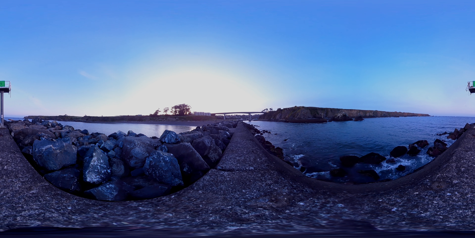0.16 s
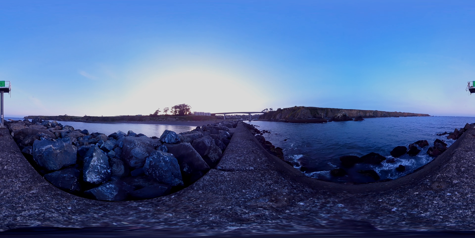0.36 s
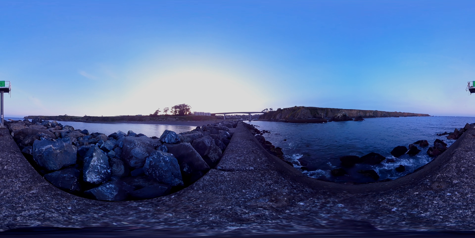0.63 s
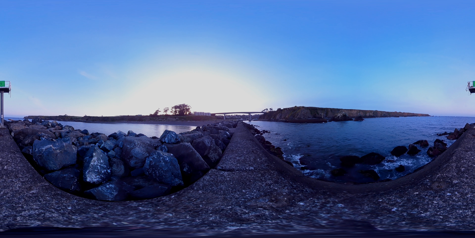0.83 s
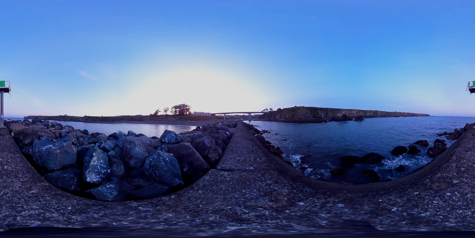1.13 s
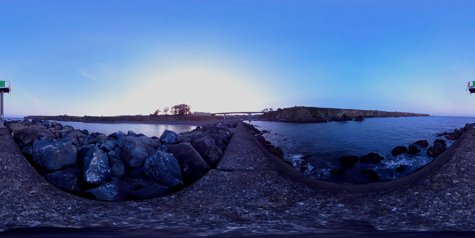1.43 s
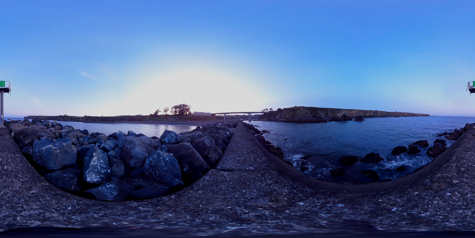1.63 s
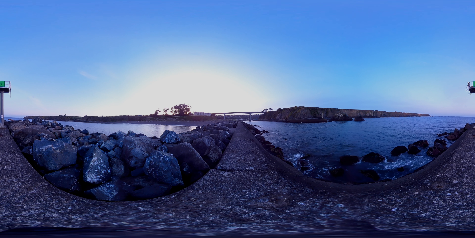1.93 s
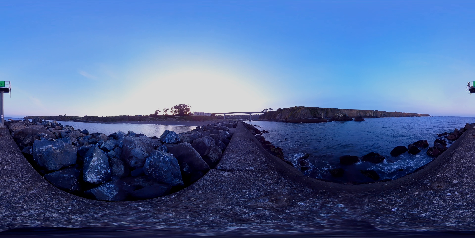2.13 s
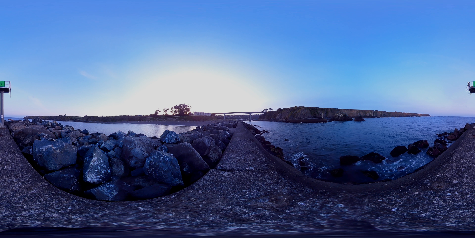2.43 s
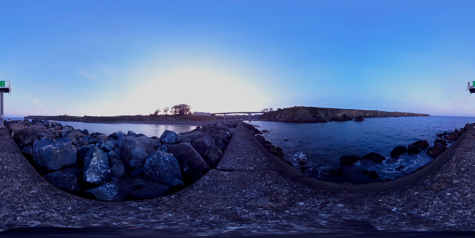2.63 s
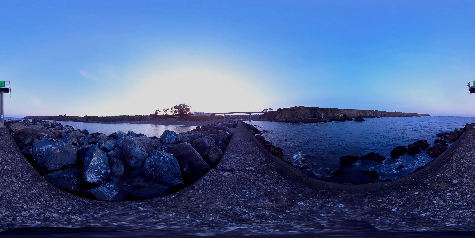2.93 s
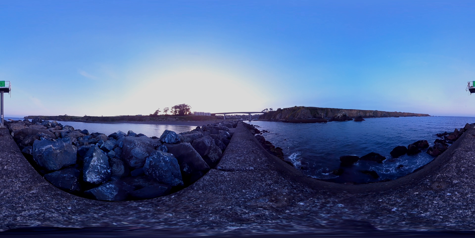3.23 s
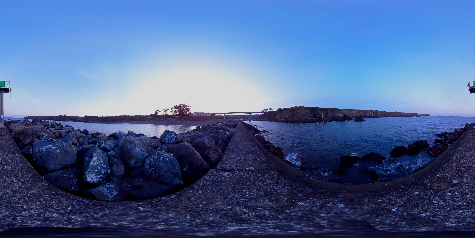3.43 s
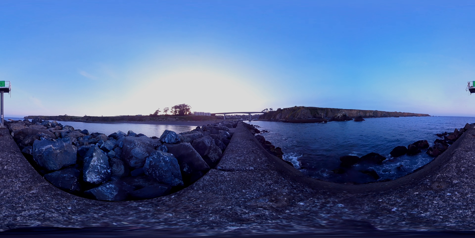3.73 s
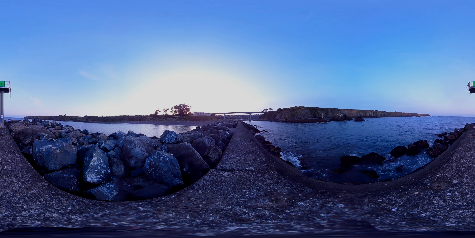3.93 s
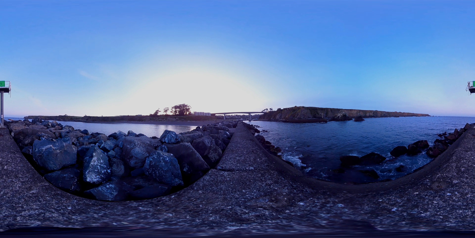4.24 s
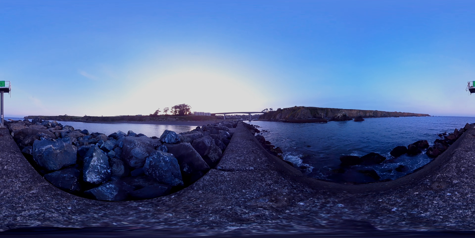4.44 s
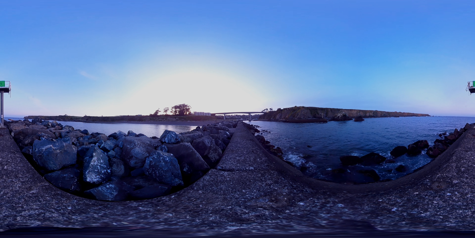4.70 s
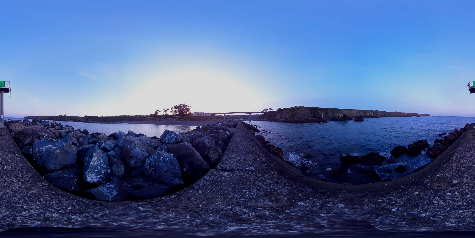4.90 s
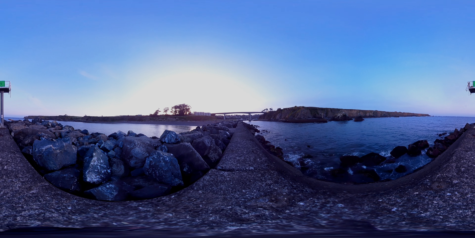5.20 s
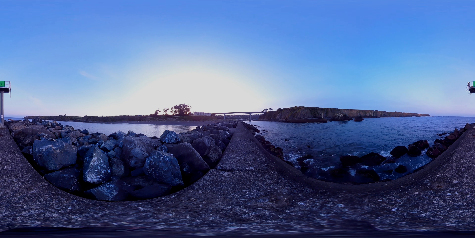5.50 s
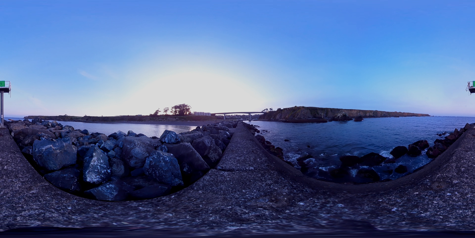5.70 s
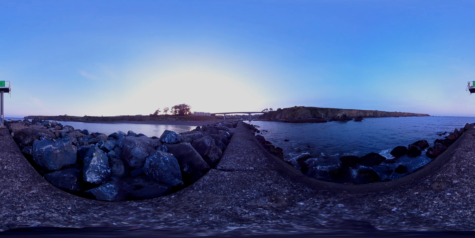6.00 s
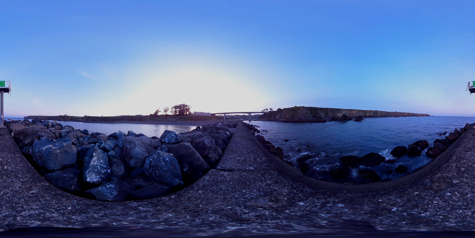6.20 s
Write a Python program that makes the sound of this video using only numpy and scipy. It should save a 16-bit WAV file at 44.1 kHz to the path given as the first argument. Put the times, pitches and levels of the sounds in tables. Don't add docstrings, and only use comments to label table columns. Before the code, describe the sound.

Small waves wash and slap over jetty rocks with foam and spray, a faint distant horn hums briefly, and wind buffets the microphone increasingly.

```python
import sys
import numpy as np
from scipy import signal
from scipy.fft import rfft, irfft, dct, next_fast_len
from scipy.io import wavfile
from scipy.ndimage import uniform_filter1d

SR = 44100
rng = np.random.default_rng(int(sys.argv[2]) if len(sys.argv) > 2 else 0)


def put_to_file(sound):
    columns = np.atleast_2d(sound).T
    safe = np.clip(columns, -1, 1)
    whole_steps = np.round(safe * 32767)
    wavfile.write(sys.argv[1], SR, whole_steps.astype(np.int16))


def gain_from_db(level_db):
    decades = np.asarray(level_db, float) / 20
    return 10 ** decades


N = 280337

# pitch_hz [Hz], level_db [dB per Hz]
SEA_COLOUR = [(250, 0.0), (600, -4.8), (1100, -7.6), (2000, -13.0), (3200, -19.7), (3900, -25.1),
              (4500, -30.4), (5100, -19.2), (5600, -13.3), (6400, -18.1), (7500, -21.2), (9600, -21.8),
              (10800, -30.4), (11600, -42.0)]
# time_s [s], level_db [dB]
ALL_AROUND = [(0, 1), (.6, 0), (1.3, 0), (1.7, -3.5), (2.2, -1.5), (2.7, -3.5), (3.0, 1), (3.5, 1),
              (4.1, 1), (4.6, 0.5), (4.9, -2), (5.5, -4), (5.9, 0), (6.36, 1.5)]


def rms_one(x):
    return x / np.sqrt(np.mean(x ** 2) + 1e-20)


def in_time(rows):
    time_s, *columns = np.transpose(rows)
    return [np.interp(np.arange(N) / SR, time_s, column) for column in columns]


def at_hz(points, hz, axis=1):
    table = np.array(points)
    return np.interp(np.log(np.maximum(hz, 1)), np.log(table[:, 0]), table[:, axis])


def drift(rate):
    r = np.exp(-80 * np.pi * rate / SR)
    coarse = rng.standard_normal(N // 40 + 2002)
    slow = signal.lfilter([1], [1, -2 * r, r * r], coarse)[2000:]
    return np.interp(np.arange(N) / 40, np.arange(len(slow)), rms_one(slow))


def shaped(x, gain):
    size = next_fast_len(N)
    hz = np.arange(size // 2 + 1) * SR / size
    return irfft(rfft(x, size) * gain(hz), size)[..., :N]


def ring(clicks, hz, t60):
    r, w = gain_from_db(-60 / (t60 * SR)), 2 * np.pi * hz / SR
    return signal.lfilter([0, np.sin(w)], [1, -2 * r * np.cos(w), r * r], clicks + 1e-18)


def add(track, s, sound):
    i = int(s * SR)
    track[..., i:i + sound.shape[-1]] += sound[..., :N - i]


def pulse(hz, cycles, rise):
    u = np.arange(int(4 * cycles / hz * SR)) * hz / SR / cycles
    swell = u * np.exp(1 - u * 2) * 2
    return swell * np.sin(2 * np.pi * cycles * u * (1 + rise * u))


def horn():
    # time_s [s], pitch_hz [Hz], level_db [dB]
    horn_course = [
        (1.0, 159.7, -66),
        (1.08, 153, -51),
        (1.3, 159.9, -56),
        (1.6, 157.8, -49),
        (1.9, 159, -45.5),
        (2.07, 156.5, -50.5),
        (2.15, 163, -82.5),
    ]
    hz, level_db = in_time(horn_course)
    phase = 2 * np.pi * np.cumsum(hz + 1.5 * drift(8)) / SR
    return np.sqrt(2) * gain_from_db(level_db + 2.0 * drift(2.7)) * np.sin(phase)


def gusts():
    # middle_s [s], length_s [s], left_db [dB], right_db [dB]
    gust_list = [(0.076, .1, -40.5, -38.5), (0.223, .12, -44.5, -41.5), (0.666, 0.13, -49, -48),
                 (0.882, 0.15, -35.5, -36), (1.273, 0.25, -43.5, -36.5), (1.505, .1, -44, -41.5),
                 (1.685, .12, -47.5, -42), (1.958, .25, -47.5, -46.5), (2.157, 0.1, -49.5, -41),
                 (2.515, 0.14, -39, -37.5), (2.755, .25, -38, -40.5), (3.018, 0.24, -36.5, -36),
                 (3.374, .15, -38, -31.5), (3.53, 0.19, -33.5, -33), (3.78, 0.069, -36, -33),
                 (3.94, 0.11, -44.5, -36.5), (4.097, 0.085, -38, -37), (4.258, 0.18, -38, -33),
                 (4.442, 0.13, -32, -38), (4.602, 0.16, -39.5, -32.5), (4.96, 0.23, -37.5, -37.5),
                 (5.164, 0.17, -36.5, -36.5), (5.252, 0.045, -43, -31.5), (5.493, .2, -34, -26.5),
                 (5.752, 0.3, -28.5, -33), (5.919, 0.11, -28, -32), (6.044, .14, -36, -27),
                 (6.185, 0.16, -27, -29), (6.286, 0.11, -36, -28.5), (6.36, .1, -23, -33)]
    edge_db, calm_db = 5.5, -55.5
    middle_s, length_s, *port_db = np.transpose(gust_list)
    t = np.arange(0, N + 100, 100) / SR
    from_middle = 2 * (t - middle_s[:, None]) / length_s[:, None]
    arch = gain_from_db(-2 * edge_db * from_middle ** 2)
    power = gain_from_db(2 * np.array(port_db)) @ arch + gain_from_db(2 * calm_db)
    return np.array([np.interp(np.arange(N) / SR, t, 10 * np.log10(p)) for p in power])


def wind():
    # pitch_hz [Hz], level_db [dB per Hz]
    wind_colour = [(15, 3.5), (30, 1), (60, 6.5), (110, 2.5), (170, -4), (260, -28), (500, -34.5),
                   (2000, -77)]
    # start_s [s], peak_db [dB], pitch_hz [Hz], left_minus_right_db [dB]
    thumps = [(0.448, -24.5, 149, 1), (0.864, -33.5, 135, -28), (0.885, -28, 93, -19),
              (3.428, -29, 41.7, 0), (3.537, -35.5, 42.6, 2), (4.271, -24.5, 135, -3),
              (4.929, -28, 107.4, 1.5), (5.409, -29, 77, 2), (5.468, -22, 55, -11), (5.52, -33, 137, -23),
              (5.587, -28.5, 80.8, -14), (5.869, -26, 115.7, 16), (6.21, -27, 135, 16.5)]
    noise = rng.standard_normal((2, N))
    rumble = shaped(noise, lambda f: gain_from_db(at_hz(wind_colour, f)) * f / (f + 8))
    gust_db = gusts()
    flutter = shaped(rumble, lambda f: np.clip(np.log2(f / 90 + 1e-9), 0, 1))
    rumble = rumble + flutter * (gain_from_db(0.43 * (gust_db + 41)) - 1)
    lumps = np.array([drift(25), drift(25)])
    evened = rumble / np.sqrt(uniform_filter1d(rumble ** 2, size=4000, axis=1))
    out = rms_one(evened * gain_from_db(0.37 * lumps)) * gain_from_db(gust_db - 2.53)
    for s, peak_db, hz, pan_db in thumps:
        port_db = peak_db - 5 + np.array([[.5], [-.5]]) * pan_db
        add(out, s, gain_from_db(port_db) * pulse(hz, 0.95, 0.0092))
    return out


def bursts():
    # start_s [s], length_s [s], level_db [dB], centre_hz [Hz]
    mist_bursts = [(0.009, 0.074, -58.5, 9950), (0.149, 0.1, -53.5, 10140), (0.351, 0.055, -57, 9910),
                   (0.446, 0.11, -58.5, 10050), (0.634, 0.051, -58, 9950), (0.724, 0.22, -61, 10110),
                   (0.998, 0.059, -64.5, 10600), (1.149, 0.17, -62.5, 10060), (1.417, 0.12, -62.5, 9980),
                   (1.591, 0.045, -67, 9130), (1.802, 0.13, -67.5, 9150), (1.935, 0.12, -65.5, 9550),
                   (2.063, 0.088, -65, 9160), (2.24, 0.044, -72, 9330), (2.818, 0.048, -57, 10100),
                   (2.952, 0.38, -57.5, 10150), (3.374, 0.08, -55.5, 9960), (3.627, 0.26, -56.5, 10090),
                   (3.999, 0.38, -58, 10180), (4.397, 0.34, -55.5, 9760), (5.047, 0.052, -65.5, 9800),
                   (5.33, 0.072, -61, 9220), (5.409, 0.077, -58.5, 9180), (5.534, 0.044, -67.5, 10440),
                   (5.768, 0.11, -64.5, 9900), (5.906, 0.077, -65, 9470), (6.006, 0.04, -62.5, 9600),
                   (6.163, 0.066, -66, 9140)]
    late_s, shorter_s = 0.005, .026
    fade_db_per_s = 2498.5
    s, length_s, level_db, hz = np.transpose(mist_bursts)
    t = np.arange(0, N + 100, 100) / SR
    start = s + late_s
    stop = start + np.maximum(length_s - shorter_s, 0)
    outside_s = np.maximum(np.maximum(start[:, None] - t, t - stop[:, None]), 0)
    each_db = level_db[:, None] - fade_db_per_s * outside_s
    return in_time(np.transpose([t, each_db.max(axis=0), hz[each_db.argmax(axis=0)]]))


def mist(level_db, hz, width_hz, faint_width_hz):
    white = rng.standard_normal((2, N))
    strong = np.clip((level_db + 70.5) / 8, 0, 1)
    wide = rms_one(shaped(white, lambda f: np.exp(-(f / width_hz) ** 4)))
    thin = rms_one(shaped(white, lambda f: np.exp(-(f / faint_width_hz) ** 4)))
    slow = strong * wide * gain_from_db(4.6 * drift(25)) + (1 - strong) * thin * gain_from_db(3.0)
    phase = 2 * np.pi * np.cumsum(hz + 60 * drift(14)) / SR
    return (slow[0] * np.cos(phase) + slow[1] * np.sin(phase)) * gain_from_db(level_db)


def bubbles(surge_db, per_s, cycles):
    sizes = gain_from_db(8.1 * np.minimum(rng.exponential(1, N), 5)) * rng.choice([-1, 1], N)
    rate = per_s * gain_from_db(surge_db - surge_db.mean() + 3 * drift(5))
    born = rng.random(N) < rate / SR
    pitches, dealt = np.geomspace(200, 1600, 16), rng.integers(0, 16, N)
    rings = sum(ring(sizes * born * (dealt == k), hz, cycles / hz) for k, hz in enumerate(pitches))
    return gain_from_db(surge_db) * rms_one(rings)


def slaps():
    # start_s [s], peak_db [dB], pitch_hz [Hz]
    hollow_slaps = [(2.013, -27.5, 396), (2.188, -27, 218), (2.239, -28, 347.3), (2.667, -25, 256),
                    (3.258, -25.5, 201.3), (3.377, -19, 362), (3.419, -20.5, 754), (3.51, -23.5, 323),
                    (3.59, -32.5, 346), (4.272, -36.5, 249), (4.463, -29, 274), (4.773, -36, 228),
                    (4.845, -29.5, 213), (5.089, -24.5, 372), (5.375, -25, 367), (5.866, -31.5, 374)]
    # start_s [s], peak_db [dB]
    splashes = [(0.0244, -46), (3.246, -32), (3.7661, -27), (3.896, -36), (4.7347, -41), (4.874, -40),
                (4.946, -26.5), (4.97, -28.5), (5.036, -36), (5.102, -28.5), (5.1993, -34), (5.3227, -48),
                (5.5012, -34.5), (5.9404, -32), (6.2094, -26)]
    out, spray = np.zeros(N), np.zeros(N)
    for s, peak_db, hz in hollow_slaps:
        add(out, s, gain_from_db(peak_db - 5) * pulse(hz, 1.2, .1))
    t = np.arange(2000) / SR
    patter = np.minimum(t / 0.0017, 1) * np.exp(-t / 0.015)
    for s, peak_db in splashes:
        add(spray, s, gain_from_db(peak_db - 6.5) * patter)
    noise = rng.standard_normal(N)
    drops = shaped(noise, lambda f: gain_from_db(at_hz(SEA_COLOUR, f)) * f / np.hypot(f, 2500) / np.hypot(f, 4000))
    return out + spray * rms_one(drops)


def wash(surge_db, foam_db, spray_db, aside, patchy_db, grain_db, low_cut_hz):
    sizes = gain_from_db(grain_db * np.minimum(rng.exponential(1, (3, N)), 5))
    grains = rng.standard_normal((3, N)) * sizes
    foam = shaped(grains, lambda f: gain_from_db(at_hz(SEA_COLOUR, f)) / np.hypot(1, (low_cut_hz / (f + 1)) ** 2))
    size = next_fast_len(N)
    spectrum = rfft(rms_one(foam), size)
    pitch = np.log2(np.arange(size // 2 + 1) * SR / size + 1)
    out, together = 0, drift(8.3)
    for octave in np.arange(6.5, 13.4, .75):
        weight = np.clip(1 - abs(np.minimum(pitch, 13.25) - octave) / .75, 0, 1)
        band = irfft(spectrum * weight, size)[:, :N]
        foamy = np.interp(octave, [10.4, 11.2, 12, 12.4], [0, 1, 1, 0])
        sprayed = np.interp(octave, [12, 12.4], [0, 1])
        flicker = patchy_db * (0.3 * together + 1.0 * drift(11) + 1.0 * drift(18))
        out = out + band * gain_from_db(surge_db + foamy * foam_db + sprayed * spray_db + flicker)
    finest = shaped(out, lambda f: np.clip((f - 9700) / 600, 0, 1))
    return out - (1 - aside) * finest


def ports(direct, scattered):
    # pitch_hz [Hz], left_lag [radians], likeness [0-1]
    port_pair = [(250, .03, .9), (500, .1, .955), (860, .37, .88), (1200, .57, .79), (1600, .77, .69),
                 (2600, 1.3, .67), (3300, 1.7, .55), (3900, 2.3, .6), (4400, 3.1, .88), (5400, 2.5, .7),
                 (6500, 3.1, .9), (8000, 3.1, .92), (11000, 3.14, .94)]

    def alike(f):
        return np.clip(at_hz(port_pair, f, axis=2), 0, 1)

    def lag(f):
        return np.exp(np.outer([-.5j, .5j], at_hz(port_pair, f)))

    lagged = shaped(direct, lambda f: np.sqrt(alike(f)) * lag(f))
    apart = shaped(scattered, lambda f: np.sqrt(1 - alike(f)))
    bright = shaped(apart, lambda f: np.clip((f - 2500) / 1200, 0, 1))
    return lagged + apart + bright * (gain_from_db(in_time(ALL_AROUND)[0]) - 1)


def scene():
    # time_s [s], surge_db [dB], froth_db [dB above usual]
    wash_course = [(0.0, -38, -.5), (0.3, -39, 0), (0.55, -41.5, 0.4), (1.3, -42.5, -1), (1.6, -42, -2),
                   (2.05, -42, 0.5), (2.32, -40.5, -3), (2.55, -41.5, -1), (3.0, -43, 0.5), (3.18, -42, 3),
                   (3.4, -38, -1.5), (3.7, -41, 1.5), (4.1, -40.5, -1), (4.85, -41, 2.5), (5.18, -40, 1.5),
                   (5.5, -40, 2.5), (6.0, -41.5, 1.5), (6.36, -41, -2)]
    surge_db, foam_db = in_time(wash_course)
    spray_db = 1.1 + 0.74 * foam_db + 0.23 * in_time(ALL_AROUND)[0]
    mist_db, mist_hz = bursts()
    aside = np.interp(mist_db, [-70, -58], [1, .35])
    sea = wash(surge_db + 2.5, foam_db, spray_db, aside, patchy_db=0.93, grain_db=0.5, low_cut_hz=167)
    air = gain_from_db(-13.0) * bubbles(surge_db, per_s=150, cycles=4)
    direct = sea[0] + air + slaps() + horn()
    hiss = mist(mist_db - 2.5, mist_hz, width_hz=680, faint_width_hz=320)
    return ports(direct, sea[1:]) + hiss + wind()


def leave_out_masked(x):
    # pitch_hz [Hz], under_both_db [dB under both channels], always_db [dB per Hz]
    masking = [(100, -30, -120), (400, -21.5, -112), (1500, -15, -108), (2700, -10.5, -106),
               (3700, -6.6, -102), (4400, -4.5, -100), (5000, -9, -102), (5600, -12, -103),
               (6100, -7, -102), (6800, -5, -103), (8200, -5, -103), (9000, -7, -103), (10200, -6, -101),
               (11500, -5, -107)]
    hop, lead, turn = 1024, 724, np.array([[1, 1], [1, -1]])
    padded = np.pad(turn @ x / 2, ((0, 0), (hop + lead, 3 * hop)))
    frames = np.lib.stride_tricks.sliding_window_view(padded, 2 * hop, axis=1)[:, ::hop]
    window = np.sin(np.pi * (np.arange(2 * hop) + .5) / (2 * hop))
    a, b, c, d = np.split(frames * window, 4, axis=2)
    folded = np.concatenate([-c[..., ::-1] - d, a - b[..., ::-1]], axis=2)
    lines = dct(folded, type=4, norm="ortho")
    near = uniform_filter1d(lines ** 2, size=6, axis=2)
    around = uniform_filter1d((lines ** 2).sum(axis=0), size=33, axis=1)
    hz = (np.arange(hop) + .5) * SR / 2 / hop
    hidden = around * gain_from_db(2 * at_hz(masking, hz))
    too_faint = gain_from_db(2 * at_hz(masking, hz, axis=2)) * SR / 2
    limit = np.maximum(hidden, too_faint)
    count = len(around)
    budget_db = np.repeat(rng.normal(0, 1.7, (2, count, 64)), 16, axis=2)
    thrift_db = .6 + 1.0 * drift(5)[np.minimum(np.arange(count) * hop, N - 1), None]
    kept = lines * (near > limit * gain_from_db(2 * (budget_db + thrift_db)))
    e, f = np.split(dct(kept, type=4, norm="ortho"), 2, axis=2)
    frames = np.concatenate([f, -f[..., ::-1], -e[..., ::-1], -e], axis=2) * window
    joined = frames[:, 1:, :hop] + frames[:, :-1, hop:]
    return turn @ joined.reshape(2, -1)[:, lead:lead + N]


def band_limit(x):
    return signal.sosfilt(signal.butter(12, 12030, fs=SR, output="sos"), x)


def record(dry):
    without_top = shaped(dry, lambda f: f < 11750)
    mix = leave_out_masked(without_top)
    return band_limit(mix)


dry = scene()
out = record(dry)
put_to_file(out)
```